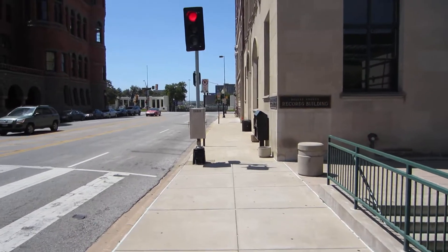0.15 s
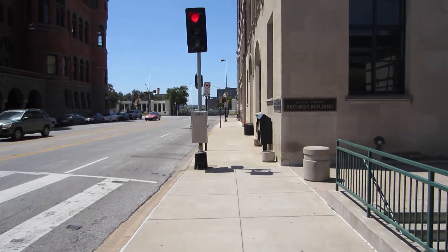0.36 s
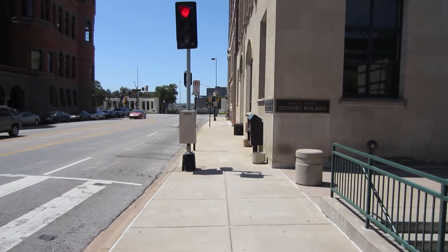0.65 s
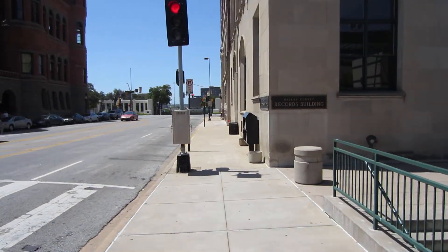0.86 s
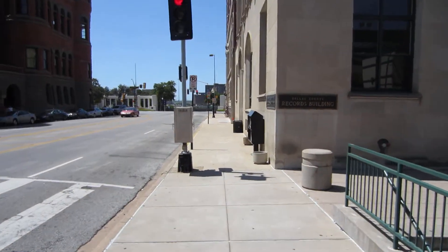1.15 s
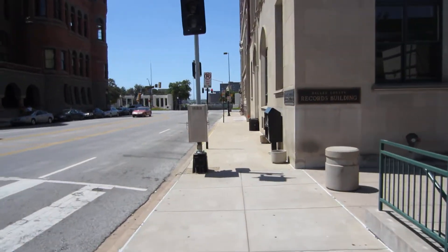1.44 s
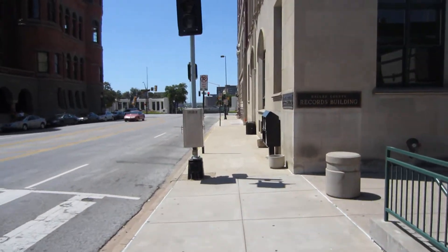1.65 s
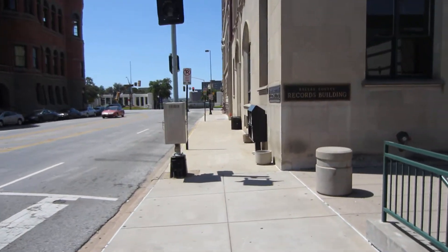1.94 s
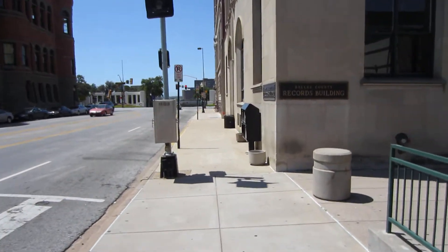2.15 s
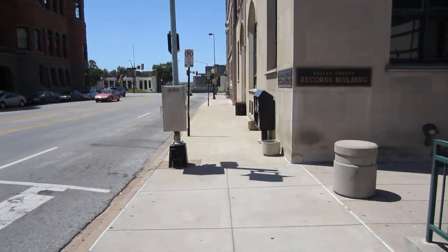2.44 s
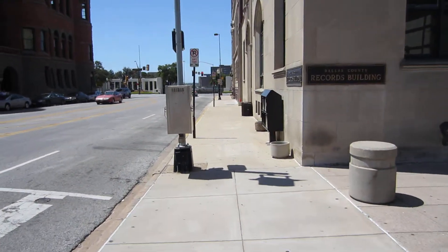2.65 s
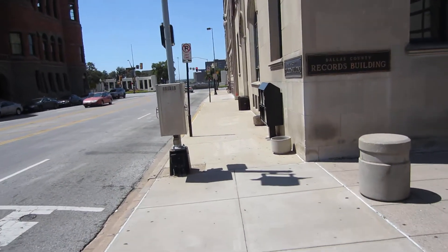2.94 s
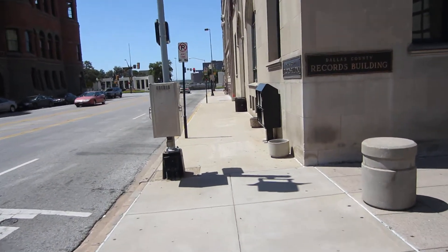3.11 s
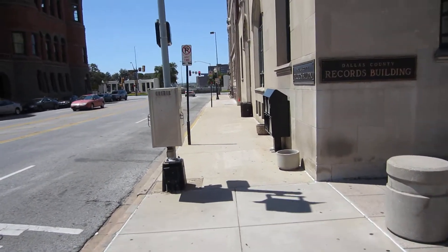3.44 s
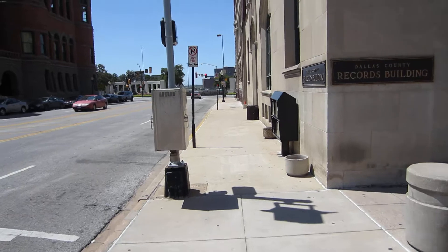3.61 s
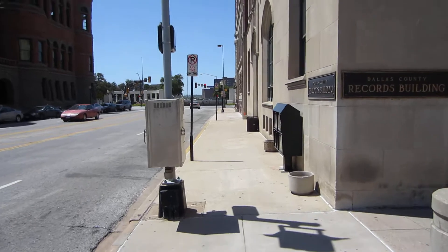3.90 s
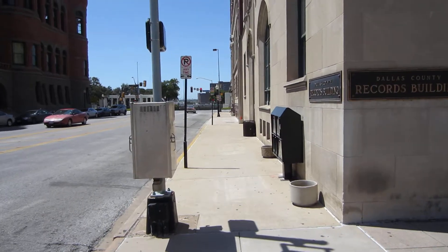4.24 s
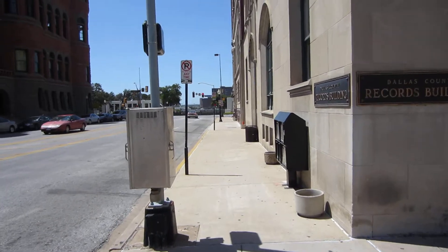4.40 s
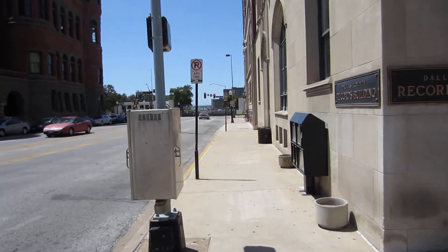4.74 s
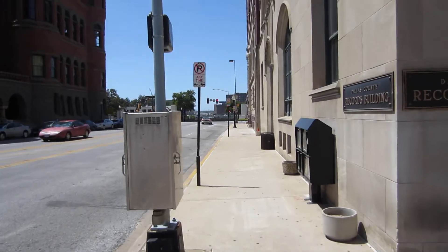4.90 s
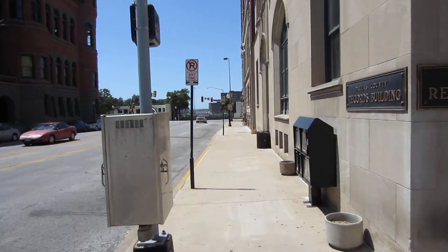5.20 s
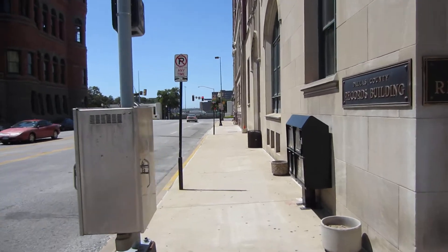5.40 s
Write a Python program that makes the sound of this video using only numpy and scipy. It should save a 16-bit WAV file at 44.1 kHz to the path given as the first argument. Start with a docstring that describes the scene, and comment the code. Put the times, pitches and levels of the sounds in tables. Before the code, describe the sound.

Outdoors on a city sidewalk, a walker's microphone picks up the continuous low roar of far engines and tyres. Gusts bump the microphone at the start, then a deep engine hum comes up, followed by a short, stronger engine surge. The rumble carries on with a few lighter gusts. Barely audible footsteps, grit ticks and thin squeaks sit beneath the traffic.

```python
"""A sunny city street, heard from a walker's camera. Far engines, exhausts and tyres blend into a dull
bed of roar; one engine hums low and another swells briefly under load. Wind gusts flutter and thump on
the right microphone port. Grit ticks and steps scuff underfoot, a few thin squeaks pass, and a fine
hiss and the very high whine of the camera's electronics sit on top."""
import sys
import numpy as np
from scipy.fft import rfft, irfft, next_fast_len
from scipy.io import wavfile
from scipy.ndimage import map_coordinates

SR = 44100
rng = np.random.default_rng(int(sys.argv[2]) if len(sys.argv) > 2 else 0)


def put_to_file(sound):
    """Save the sound as 16-bit audio at rate SR, in the file named by the first command-line argument."""
    columns = np.atleast_2d(sound).T  # one column per channel
    safe = np.clip(columns, -1, 1)
    whole_steps = np.round(safe * 32767)
    wavfile.write(sys.argv[1], SR, whole_steps.astype(np.int16))


N = 245195

# fader rides of the traffic bed (time [s], engines [dB], exhausts [dB])
TRAFFIC_RIDE = [(0, -19, -18), (.5, -25.5, -24), (1.1, -22.5, -21), (1.8, -27, -21.5), (2.5, -23.5, -22),
                (3.5, -25.5, -21.5), (4.2, -22, -20.5), (4.7, -25, -22), (5.56, -23.5, -20.5)]
# fader ride of the low engine hum (time [s], level [dB])
HUM_RIDE = [(0, -49), (1.0, -29.5), (1.4, -29), (1.7, -25), (2.0, -31), (2.3, -27), (2.8, -33.5),
            (3.6, -45), (5.56, -50)]
# tone colours of the vehicle layers (frequency [Hz], relative density [dB])
ENGINE_EQ = [(8.8, -47.5), (15, -23.5), (43, -3), (81, -3.5), (110, -5.5), (140, -33), (240, -120)]
EXHAUST_EQ = [(47, -37.5), (80, -9), (108, -2.5), (162, -0.5), (258, -7), (350, -10.5), (378, -12.5),
              (480, -23), (620, -39.5), (1060, -120)]
TYRE_EQ = [(250, -39), (420, -2.5), (720, -5), (1090, -11), (1840, -22.5), (3050, -42.5), (3960, -69),
           (6710, -120)]
HUM_EQ = [(30, -120), (44, -30), (51, -2), (55, 0), (59, -3), (68, -30), (100, -120)]
SURGE_EQ = [(100, -120), (170, -30), (205, -3), (240, 0), (320, -2), (390, -7), (450, -30), (800, -120)]
# gusts over the right port (time [s], level [dB], half-length [s])
GUST_CUES = [(.14, -26.5, .07), (.55, -26, .04), (.68, -21.5, .07), (.9, -40, .12), (1.24, -34, .07),
             (1.46, -31, .05), (1.6, -25, .07), (1.89, -30.5, .08), (2.45, -39.5, .15), (3.2, -39, .15),
             (4.02, -28.5, .07), (4.82, -31.5, .09), (5.0, -35, .08), (5.33, -28.5, .08)]
# eddies hitting the right port (time [s], level [dB], nominal pitch [Hz])
THUMP_CUES = [(0.208, -3, 120), (0.541, -14.5, 60), (.598, -9, 100), (0.618, -12.5, 150), (.718, -9, 120),
              (.734, -3.5, 58), (.746, -9, 90), (1.501, -11, 100), (1.523, -16, 100), (1.59, -18.5, 70),
              (1.835, -13, 110), (1.866, -5, 78), (1.879, -18, 110), (4.0, -15.5, 75), (4.009, -14, 75),
              (4.075, -21, 130)]
# grit underfoot (time [s], peak before the low cut [dB], left minus right [dB])
GRIT_CUES = [(.1925, -51, -1), (.363, -54, -4), (.385, -54, 2), (.389, -55, 0), (1.3, -60, 3),
             (1.4985, -52, -5), (1.529, -59, -1), (1.977, -56, -2), (2.121, -48, -3), (2.278, -60, -4),
             (2.6355, -53, -2), (2.6735, -49, 0), (3.033, -57, 9), (3.596, -53, -3), (4.907, -59, -4),
             (4.9195, -49, 2), (4.9515, -50, -2)]
# thin squeaks (start [s], length [s], first pitch [Hz], last pitch [Hz], level [dB])
SQUEAK_CUES = [(.2, .36, 15600, 15270, -77), (1.245, .028, 5880, 5870, -68), (1.295, .03, 5750, 5500, -71),
               (1.32, .11, 7780, 7600, -82), (1.45, .08, 8000, 7950, -75), (1.51, .15, 7870, 7780, -82),
               (3.49, .035, 15700, 15200, -70), (4.12, .13, 15320, 15260, -70)]
# soles scuffing the pavement (time [s], level [dB])
SCUFF_CUES = [(.375, -85), (0.969, -87.5), (1.52, -84.5), (2.125, -82), (2.65, -81.5), (3.25, -86),
              (3.78, -84.5), (4.93, -83.5)]
# fader ride of the top hiss (time [s], level [dB])
TOP_HISS_RIDE = [(0, -76.5), (2.0, -74), (3.75, -73.5), (3.95, -75), (5.56, -75)]
# tone colours of wind, grit and hiss (frequency [Hz], relative density [dB])
FLUTTER_EQ = [(5, -120), (15, -18.5), (30, 1), (60, 1.5), (120, -12), (250, -23), (500, -40.5),
              (1000, -59.5), (3000, -120)]
GRIT_EQ = [(1500, -120), (3500, -24), (5500, -4), (8000, -8), (10000, 0), (14000, 0), (16000, -5)]
STREET_HISS_EQ = [(1500, -120), (2400, -14), (3000, -3.5), (4300, -3.5), (5000, -6.5), (6300, -11.5),
                  (7100, -19), (7700, -30.5), (9000, -60), (11000, -120)]
TOP_HISS_EQ = [(5000, -120), (7000, -22), (7900, -10), (8600, -5), (9300, -2), (10000, 0), (12000, 0),
               (13400, -2), (14800, -5), (15800, -6)]
# steady tones of the electronics (frequency [Hz], left [dB], right [dB])
WHINE_TONES = [(7867.1, -102, -100), (12037, -101, -101), (15734.27, -86.5, -73), (15747.2, -93.5, -80)]
# how alike the two ports hear the street (frequency [Hz], correlation [0..1])
PORT_LIKENESS = [(40, .99), (100, .99), (200, .985), (300, .98), (520, .96), (890, .91), (1500, .62),
                 (2200, .47), (3000, .2), (4500, .3), (8000, .2), (10000, .15), (15000, .1)]
# balance between the ports (frequency [Hz], left minus right [dB])
PORT_BALANCE = [(40, .8), (200, .4), (900, .4), (1700, 1.1), (2300, -.4), (3000, 1.8), (5200, 3.1),
                (7000, 0.1), (9500, -2.1), (12000, -.4), (15000, -.6)]
# phase between the ports (frequency [Hz], left lead [rad])
PORT_PHASE = [(100, 0), (500, -.12), (1200, -.1), (2200, 0), (3300, 1.9), (7500, 1.7), (10000, 3),
              (14000, 2.4)]

TYRES_DB = -32
SURGE_AT_S, SURGE_HOLD_S = 2.48, .36
SURGE_DB, SURGE_SAG_DB, SURGE_FADE_DB_PER_S = -21.5, 1.5, 120
CALM_DB = -45.5  # flutter between gusts
THUMP_CYCLES = .52  # half-length, in periods of the nominal pitch
SQUEAK_EDGE = .25  # share of the length for each fade
SCUFF_HALF_S = .035
STREET_DB, STREET_RISE_DB_PER_S = -66, 0.3  # the hiss grows as a car draws nearer
HIGH_CUT_HZ = 15790


def traffic_roar():
    """The bed: many far vehicles merge into three noise bands, of engines, exhausts and tyres."""
    engines_db, exhausts_db = curves(TRAFFIC_RIDE)
    motors = amp(engines_db) * stereo_noise(ENGINE_EQ) + amp(exhausts_db) * stereo_noise(EXHAUST_EQ)
    tyres_db = TYRES_DB + 0.33 * wobble(7) + 0.4 * wobble(1.5)
    return motors + amp(tyres_db) * stereo_noise(TYRE_EQ)


def engine_hum():
    """A slow engine's firing note, blurred by distance into a narrow band of bass."""
    return amp(curves(HUM_RIDE)[0]) * stereo_noise(HUM_EQ)


def engine_surge():
    """An engine pulls under load: fast attack, a hold that sags a little, fast release."""
    progress = (np.arange(N) / SR - SURGE_AT_S) / SURGE_HOLD_S
    outside_hold_s = SURGE_HOLD_S * np.maximum(np.maximum(-progress, progress - 1), 0)
    level_db = SURGE_DB - SURGE_SAG_DB * np.clip(progress, 0, 1) - SURGE_FADE_DB_PER_S * outside_hold_s
    return amp(level_db) * stereo_noise(SURGE_EQ)


def wind_flutter():
    """Gusts rumble in lumps over the right port; the sheltered left one gets little."""
    rumble = filtered(rng.standard_normal((2, N)), lambda hz: amp(along(FLUTTER_EQ, hz)))
    lumps = amp(3.5 * np.array([wobble(30), wobble(30)]))
    return swells(GUST_CUES, CALM_DB) * unit_rms(rumble * lumps) * amp([[-14], [0]])


def wind_thumps():
    """Each eddy pushes on the right membrane, then the pressure flips abruptly and it recoils."""
    thumps = np.zeros(N)
    for at_s, db, hz in THUMP_CUES:
        cycles = hz * (np.arange(N) / SR - at_s)
        swing = np.tanh(6 * cycles / THUMP_CYCLES) * np.cos(np.pi * cycles)
        thumps -= amp(db) * swing * np.exp(-(cycles / THUMP_CYCLES) ** 2)
    return thumps * amp([[-24], [0]])


def grit_ticks():
    """Each grain of grit cracks underfoot for about a millisecond."""
    size = 256  # samples
    ticks = np.zeros((2, N + size))
    colour = amp(along(GRIT_EQ, np.fft.rfftfreq(size, 1 / SR)))
    decay = amp(-60 * np.arange(size) / SR / .004)  # 60 dB down in 4 ms
    for at_s, db, pan_db in GRIT_CUES:
        crack = irfft(rfft(rng.standard_normal(size)) * colour) * decay
        gains = amp([[db + pan_db / 2], [db - pan_db / 2]])
        start = round(at_s * SR)
        ticks[:, start:start + size] += gains * crack / abs(crack).max()
    return filtered(ticks[:, :N], lambda hz: hz / np.hypot(hz, 5000))  # gentle low cut


def squeaks():
    """Thin, slightly unsteady tones that glide down."""
    out = np.zeros(N)
    for start_s, length_s, from_hz, to_hz, db in SQUEAK_CUES:
        progress = np.clip((np.arange(N) / SR - start_s) / length_s, 0, 1)
        fade = np.clip(np.minimum(progress, 1 - progress) / SQUEAK_EDGE, 0, 1)
        hz = from_hz + (to_hz - from_hz) * progress + 65 * wobble(200)
        tone = np.sqrt(2) * np.sin(2 * np.pi * np.cumsum(hz) / SR)
        out += fade * amp(db + 3 * wobble(120)) * tone
    return out


def hiss_and_scuffs():
    """Street hiss under a thin, flickering top that lifts with each grainy scuff of a sole."""
    scuffs = swells([(at_s, db, SCUFF_HALF_S) for at_s, db in SCUFF_CUES], floor_db=-140)
    scuffs *= unit_rms(amp(5 * wobble(150)))
    street_db = STREET_DB + STREET_RISE_DB_PER_S * np.arange(N) / SR + 0.6 * wobble(7.5)
    street = amp(street_db) * stereo_noise(STREET_HISS_EQ)
    top_db = curves(TOP_HISS_RIDE)[0] + .5 * wobble(12) + .9 * wobble(60)
    return street + (amp(top_db) + scuffs) * stereo_noise(TOP_HISS_EQ)


def camera_whine():
    """The electronics sing in faint steady tones; the two highest beat."""
    t = np.arange(N) / SR
    return sum(np.sqrt(2) * amp([[left_db], [right_db]]) * np.sin(2 * np.pi * hz * t)
               for hz, left_db, right_db in WHINE_TONES)


def amp(db):
    return 10 ** (np.asarray(db) / 20)


def unit_rms(x):
    return x / np.sqrt(np.mean(x ** 2) + 1e-20)


def along(points, hz):
    """Read (frequency [Hz], value) points on a log frequency axis."""
    knots_hz, values = np.transpose(points)
    return np.interp(np.log(hz + 1), np.log(knots_hz + 1), values)


def curves(rows):
    """One automation curve for each column after the time."""
    times, *columns = np.transpose(rows)
    return [np.interp(np.arange(N) / SR, times, column) for column in columns]


def swells(rows, floor_db):
    """Bell-shaped rises (time [s], level [dB], half-length [s]) over a steady floor."""
    t = np.arange(N) / SR
    return amp(floor_db) + sum(amp(db) * np.exp(-((t - s) / half_s) ** 2) for s, db, half_s in rows)


def wobble(rate):
    """Smooth random modulation, rate knots a second."""
    return map_coordinates(rng.standard_normal(int(N * rate / SR) + 4), [np.arange(N) * rate / SR])


def filtered(x, response):
    """EQ x with a gain given as a function of frequency."""
    size = next_fast_len(N + 8192)
    return irfft(rfft(x, size) * response(np.fft.rfftfreq(size, 1 / SR)), size)[..., :N]


def stereo_noise(eq):
    """Coloured noise with a mid of rms 1: centred in the bass, wide in the treble."""
    def mid_side_gains(hz):
        width = np.arccos(np.clip(along(PORT_LIKENESS, hz), -1, 1)) / 2
        return amp(along(eq, hz)) * [np.cos(width), np.sin(width)]
    mid, side = filtered(rng.standard_normal((2, N)), mid_side_gains)
    return np.array([mid + side, mid - side]) / np.sqrt(np.mean(mid ** 2) + 1e-20)


def scene():
    """The mix: the street reaches the ports shifted in level and phase; grit and wind go in direct."""
    def ports(hz):
        left = amp(along(PORT_BALANCE, hz) / 2) * np.exp(.5j * along(PORT_PHASE, hz))
        return np.array([left, 1 / left])
    street = traffic_roar() + engine_hum() + engine_surge() + hiss_and_scuffs() + squeaks()
    return filtered(street, ports) + grit_ticks() + wind_flutter() + wind_thumps()


def record(dry):
    """The camera adds its whine, then a brick-wall high cut."""
    return filtered(dry + camera_whine(), lambda hz: hz < HIGH_CUT_HZ)


dry = scene()
out = record(dry)
put_to_file(out)
```